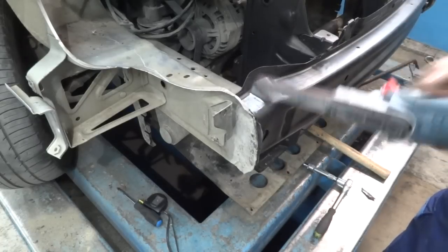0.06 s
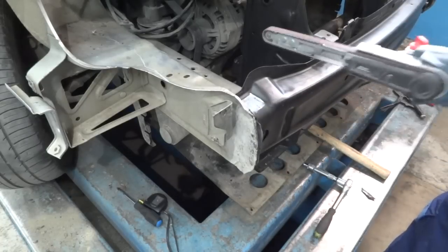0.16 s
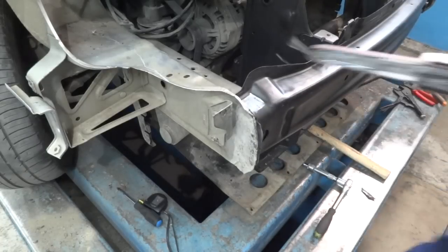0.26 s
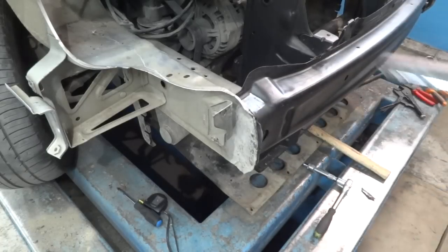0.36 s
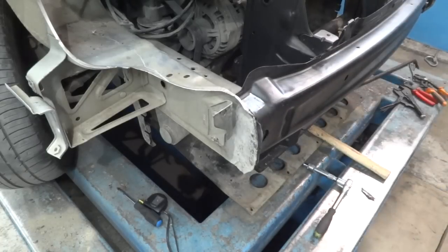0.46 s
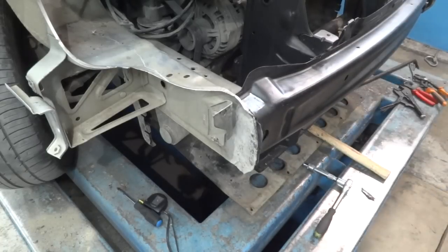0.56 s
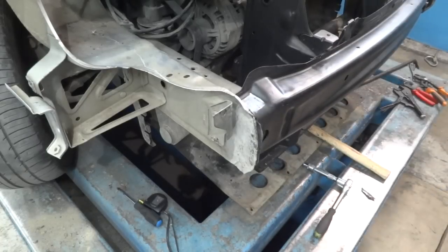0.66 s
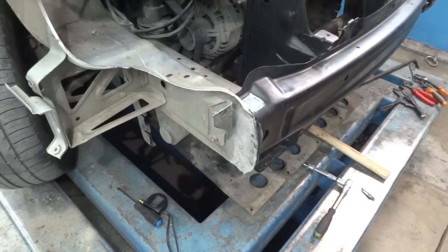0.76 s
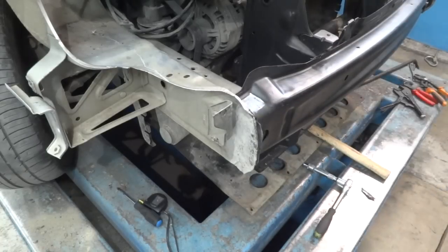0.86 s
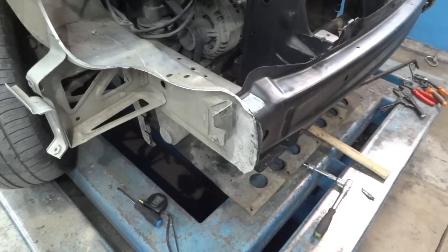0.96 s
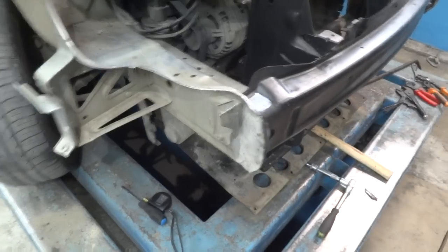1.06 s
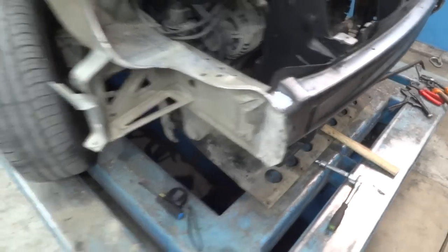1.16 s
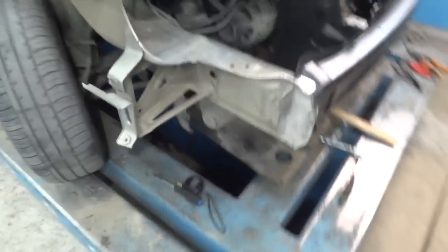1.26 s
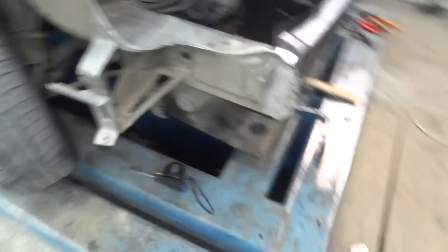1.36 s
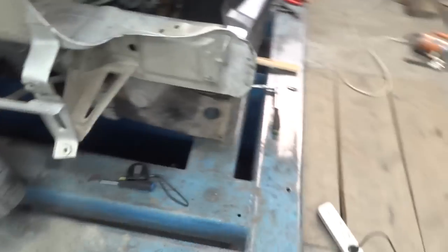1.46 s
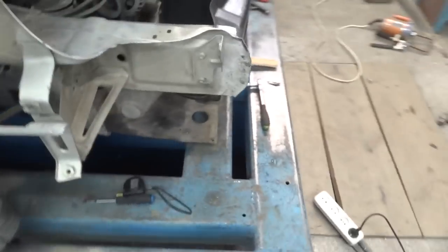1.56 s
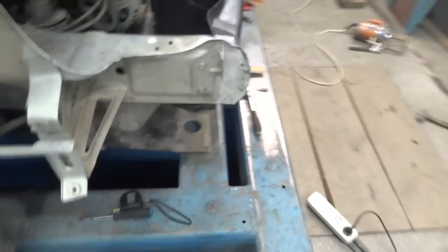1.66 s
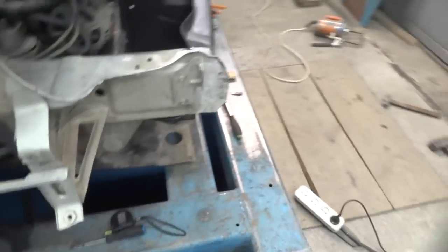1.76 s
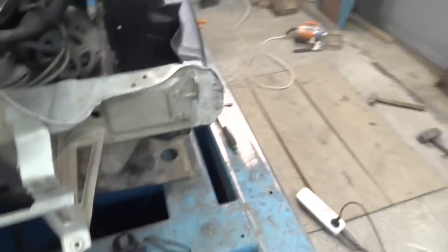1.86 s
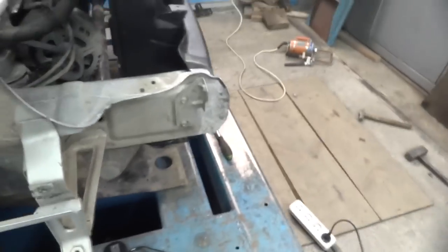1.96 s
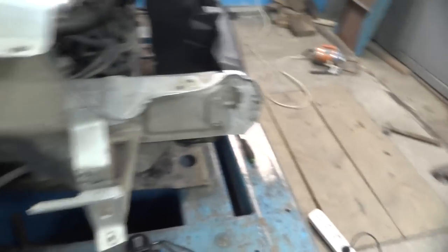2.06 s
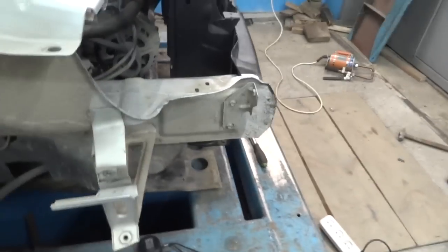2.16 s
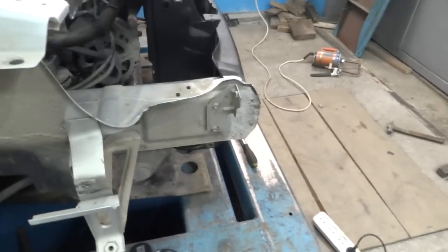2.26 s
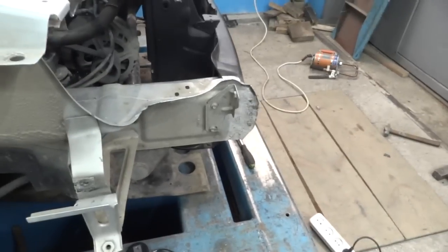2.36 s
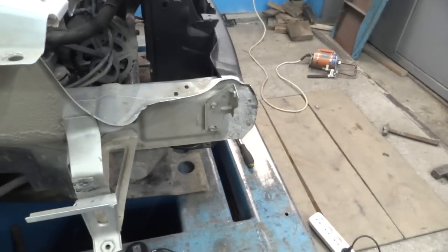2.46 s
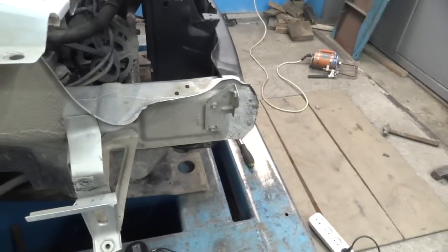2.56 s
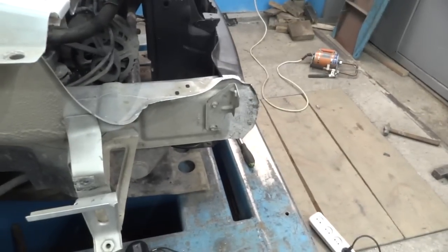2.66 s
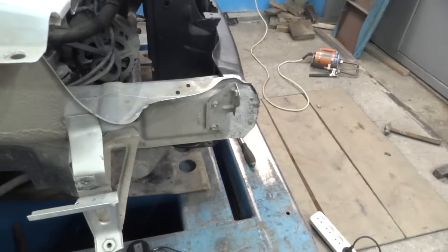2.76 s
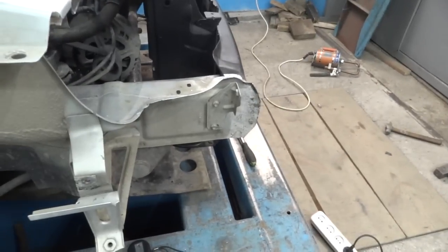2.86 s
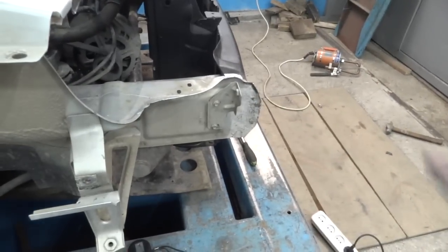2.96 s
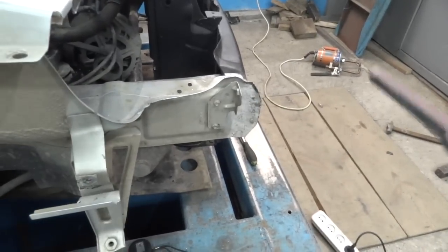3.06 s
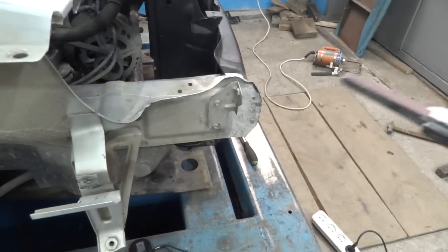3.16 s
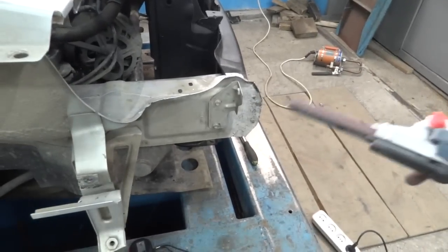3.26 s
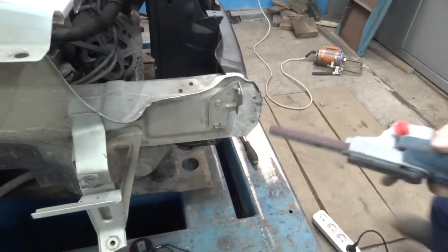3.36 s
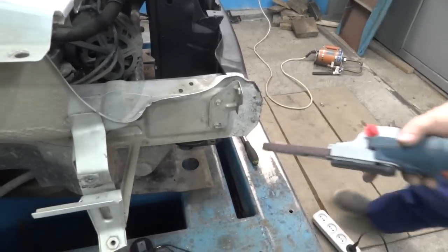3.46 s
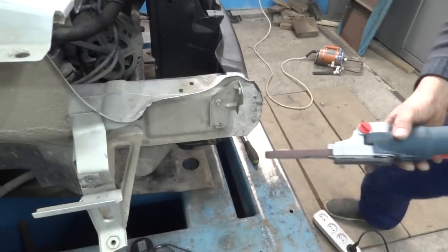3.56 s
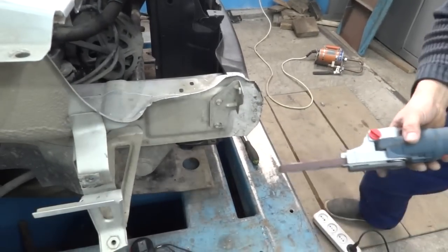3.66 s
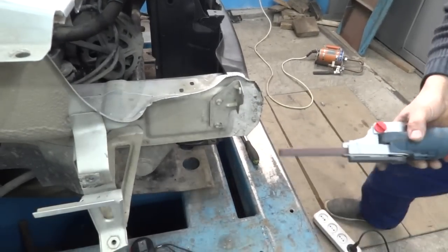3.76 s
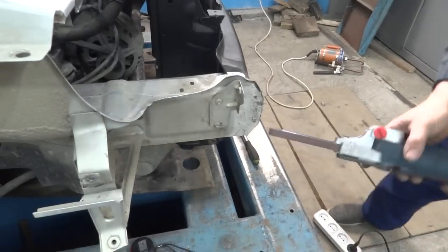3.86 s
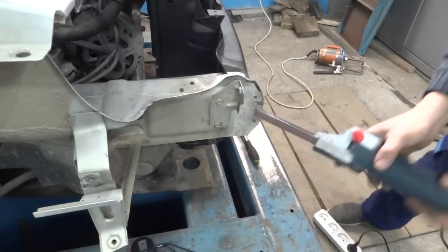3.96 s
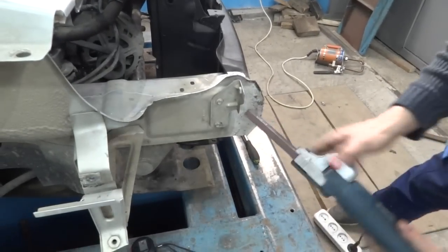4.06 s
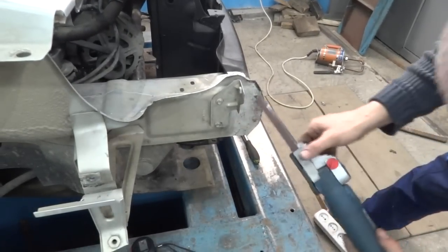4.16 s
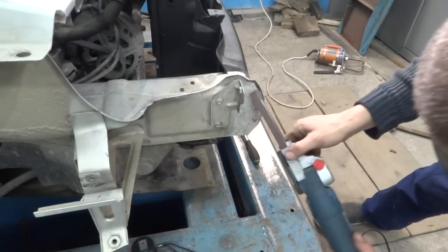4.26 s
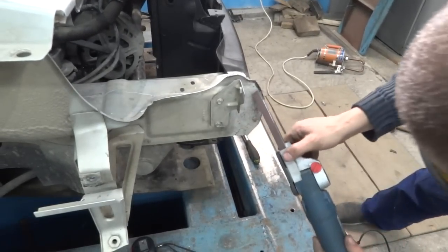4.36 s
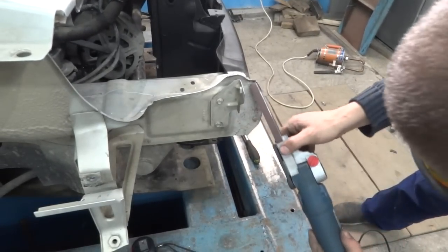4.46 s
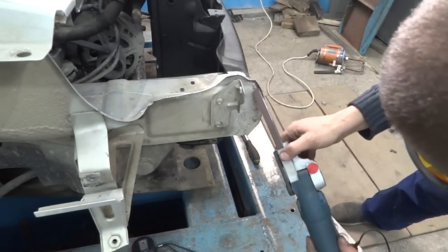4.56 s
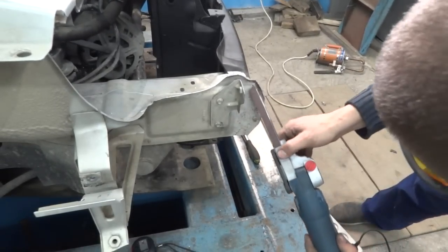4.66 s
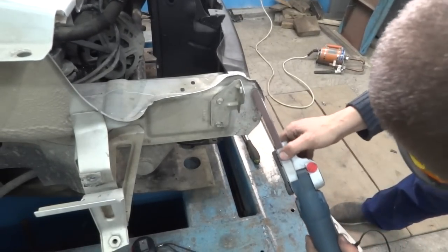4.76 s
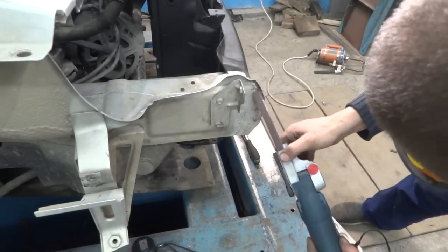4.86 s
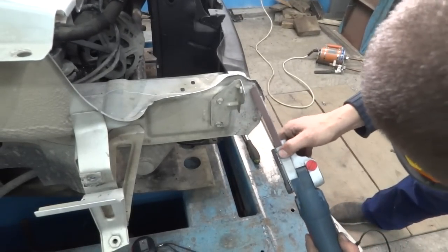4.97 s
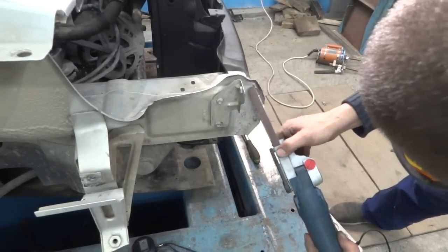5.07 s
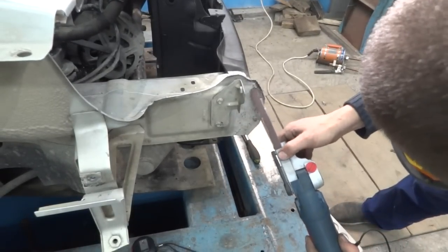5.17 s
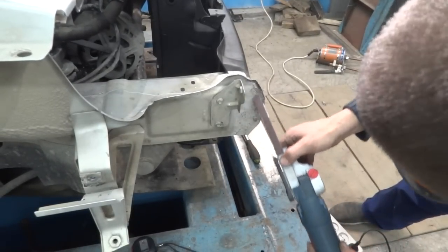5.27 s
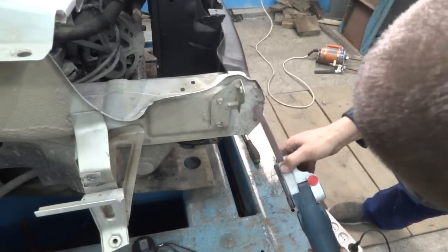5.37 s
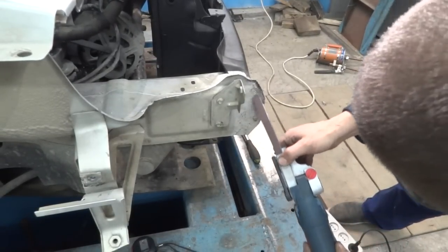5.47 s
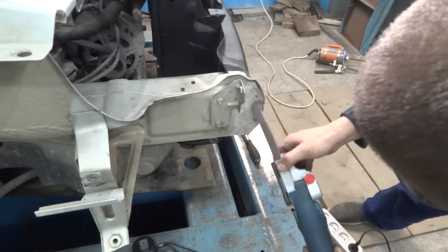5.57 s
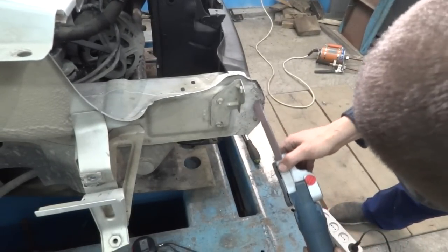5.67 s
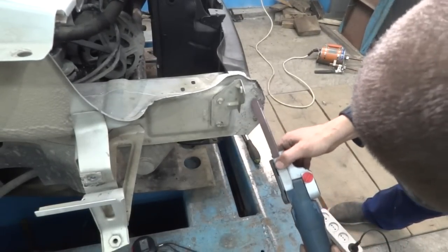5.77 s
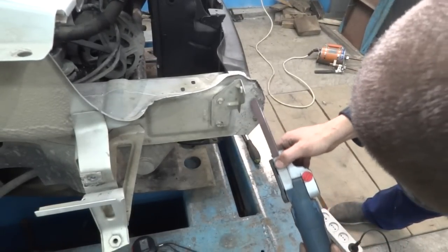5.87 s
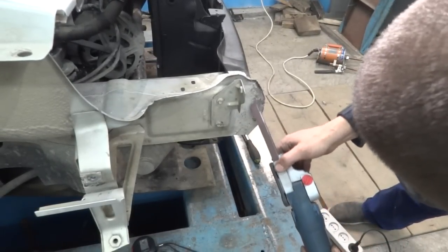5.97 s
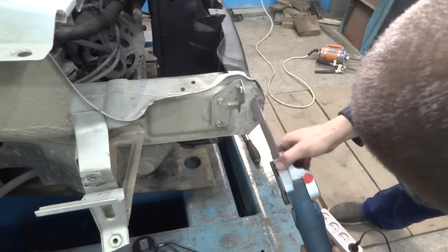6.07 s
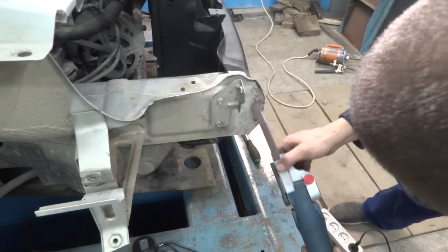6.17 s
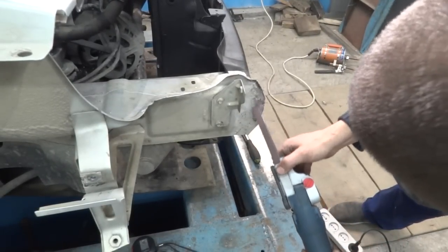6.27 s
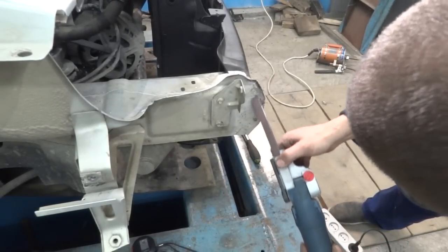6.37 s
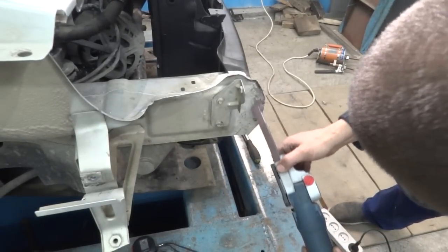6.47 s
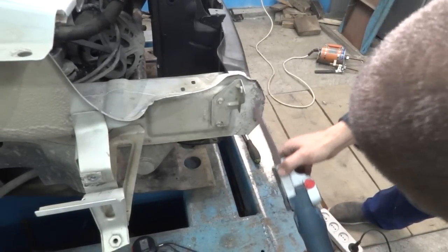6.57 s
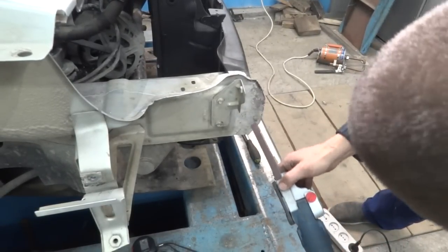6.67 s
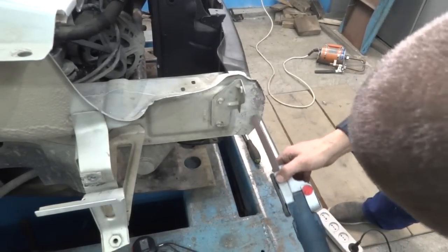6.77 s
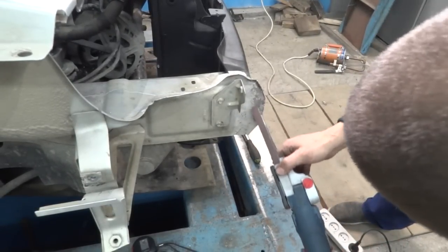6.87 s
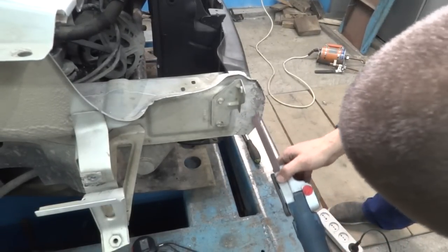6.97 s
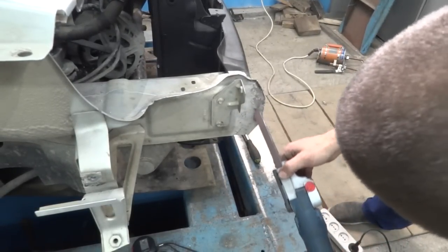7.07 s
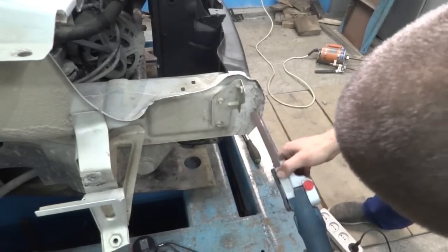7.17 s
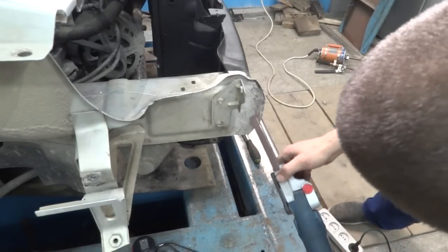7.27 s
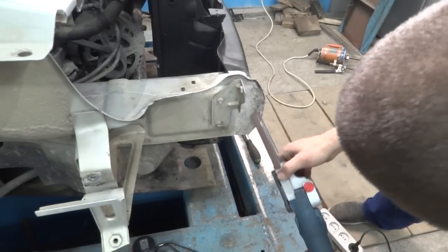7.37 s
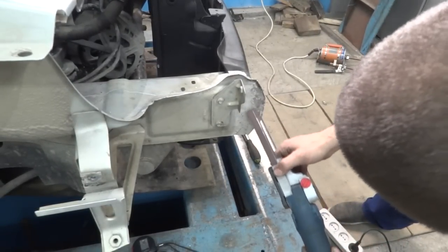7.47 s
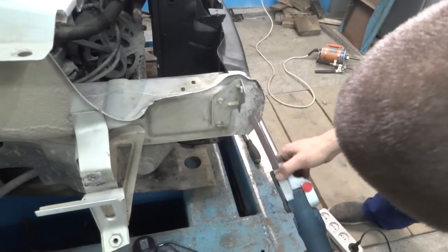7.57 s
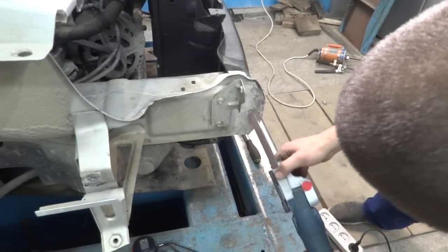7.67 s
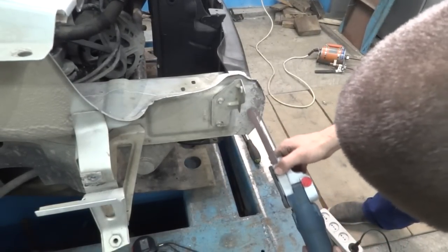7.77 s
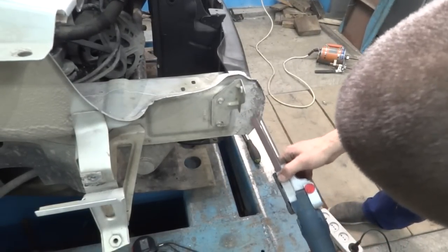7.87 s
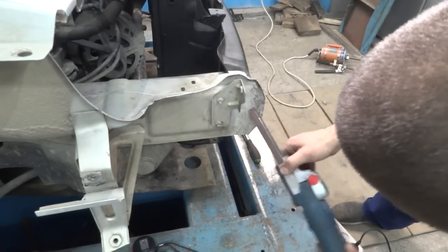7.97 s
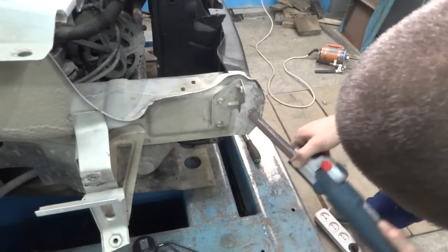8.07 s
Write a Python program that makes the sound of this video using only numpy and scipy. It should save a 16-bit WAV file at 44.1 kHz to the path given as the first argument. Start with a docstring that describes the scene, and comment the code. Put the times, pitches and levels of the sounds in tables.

```python
"""A handheld belt file grinds a car's steel frame rail in a garage, lifts off and winds down.
Clothes rustle and things knock while the worker changes sides; then the motor spins up again
and the belt bites in three long strokes, the motor sagging under each. The grind is noise through
the rail's flaring resonances; the motor is shaped rush with a whine and overtones tied to the shaft.
Rubs, taps and thuds are short noise bursts; a noise tail gives the garage, with still air behind."""
import sys
import numpy as np
from scipy import signal
from scipy.io import wavfile
from scipy.ndimage import uniform_filter1d

SR = 44100
rng = np.random.default_rng(int(sys.argv[2]) if len(sys.argv) > 2 else 0)


def transcribe(u):
    """Save the signal u as a 16-bit wav file named by the first command-line argument.

    u: samples, shape (n,) or (channels, n), limited to [-1, 1]; the rate is SR.
    q: integer samples, one column per channel.
    """
    v = np.clip(np.atleast_2d(u).T, -1, 1)
    q = np.round(v * 32767).astype(np.int16)
    wavfile.write(sys.argv[1], SR, q)


N = 358091
T = np.arange(N) / SR

# the belt pressed on the steel: start t/s, end t/s, level/dB, motor sag at first f/Hz,
# sag at last f/Hz, rocks of the hand [1/s], rocking depth/dB
STROKES = [(-.03, 0.078, -26.5, 105, 104.6, 4.4, -6), (4.369, 5.377, -24, 55, 149.2, 5.8, 0),
           (5.478, 6.664, -23, 128, 152, 6.86, 0), (6.852, 8.196, -22.5, 82, 82, 6.74, 1)]
# ringing of the frame rail: f/Hz, width f/Hz, mean level/dB above the rasp
RAIL_MODES = [(578, 50, 17), (805, 45, 17), (1219, 135, 14), (1349, 107, 11), (1647, 14, 8),
              (2013, 120, 14), (2202, 31, 9), (2339, 120, 10), (2505, 46, 8), (3292, 117, 15),
              (3583, 130, 13), (3726, 70, 13), (4280, 78, 13), (4490, 102, 7), (4823, 122, 11),
              (5001, 109, 9), (5262, 170, 8), (5571, 50, 10), (5642, 55, 10), (5945, 90, 7),
              (6354, 158, 12), (6601, 162, 8), (7035, 150, 10), (7275, 114, 11), (7765, 220, 10),
              (9045, 240, 9), (10180, 180, 6), (10550, 140, 6), (11743, 380, 8)]
# dips and small lifts between the rail's resonances: f/Hz, width f/Hz, level/dB
RAIL_GAPS = [(1010, 26, 0), (1640, 160, -5), (2940, 510, -2.5), (4430, 110, 1.5), (6210, 75, -1),
             (6620, 130, -8), (7360, 47, -1.5), (8630, 830, -2.5), (10900, 220, -2.5)]
# colour of the rasp at each place that the belt touches: f/Hz, level/dB in stroke 1, 2, 3, 4
RASP_COLOURS = [(250, -49.5, -49, -57, -59), (430, -33.5, -11, -68, -70), (470, -4.5, -20.5, -48, -57),
                (706, -17, -17, -17, -19), (1020, -20.5, -16.5, -24.5, -11.5),
                (1520, -5.5, -7, -6.5, -12.5), (2246, -5.5, 4, -2, -0.5), (3000, -30.5, -1.5, -5.5, -2.5),
                (3610, 4, 0.5, -3.5, -6), (4640, -3, 1, -2.5, 1.5), (6430, 2.5, 4.5, -0.5, -3),
                (8000, 0, 1.5, -2.5, -1), (10000, 11.5, 3.5, -1, -2), (12800, -11.5, 1.5, -4, -5),
                (15600, -23.5, -4.5, -4, -6)]
# the belt chatters and one mode sings out: start t/s, length t/s, centre f/Hz, peak level/dB
CHATTER_RINGS = [(-.03, 0.21, 1648, -36.5), (-.03, 0.2, 2004, -35), (-.03, 0.12, 2156, -31.5),
                 (-.03, 0.19, 3270, -34), (-.03, 0.14, 9600, -37), (3.874, .075, 4010, -30),
                 (4.38, 0.074, 2080, -32), (4.404, 0.14, 4330, -36.5), (4.551, 0.95, 3718, -33),
                 (6.045, .62, 5580, -34.5), (6.86, 0.12, 4830, -47), (7.642, 0.049, 2010, -31.5),
                 (7.644, 0.13, 3310, -29.5)]
# overtones from fan blades and commutator:
# multiple of the whine [ratio], basic level/dB against the rush, width f/Hz
OVERTONES = [(2, -22, 12), (2.52, -23, 25), (3, -21, 15), (4, -23, 15), (7.9, -17, 120), (8, -16, 20),
             (8.6, -19, 300), (10, -12.5, 12), (11, -21, 40), (20, -21, 60), (29.5, -11, 250),
             (31.2, -17, 120)]
# colour of the motor's rush, of which the rows above 1200 Hz are used: f/Hz, level/dB
RUSH_TREBLE = [(590, -46), (1000, -16), (1480, -7.5), (1700, -5.5), (2610, 2), (3140, 0), (5400, 0),
               (6130, 0.5), (8570, 3), (9290, 0.5), (13900, -2), (15800, -4)]
# bottom end of the same rush: f/Hz, level/dB
RUSH_BASS = [(150, -66), (350, -73), (550, -23), (800, -19.5), (1100, -9)]
# hollow rustle of the slowing belt: f/Hz, level/dB
SLOW_BELT_COLOUR = [(180, -47), (300, -23), (354, -30.5), (600, -26.5), (731, -27.5), (821, -11),
                    (1160, -13), (1940, 1.5), (2440, -6.5), (3450, -2), (3870, -1.5), (8280, 0.5),
                    (15500, -3.5)]
# level of the rush at full speed, before the left-right balance: t/s, level/dB
TOOL_LEVEL = [(0, -26), (.2, -28), (.46, -28.5), (1.4, -25.5), (3.87, -26.5), (4.36, -24.5), (4.48, -37),
              (8.12, -39)]
# whine against the rush at full speed, before rail resonance and flutter: t/s, level/dB
WHINE_LEVEL = [(.05, -25.5), (.24, -8), (.5, -12.5), (4.02, -12.5), (4.55, -15.5), (4.85, -6), (5.5, -12.5),
               (5.72, -1.5), (5.85, -25.5), (6.96, -6.5), (7.35, -23), (7.6, -8), (8.12, -20.5)]
# sharp plastic clicks, the last one the trigger: t/s, level/dB
CLICKS = [(1.688, -44), (2.986, -53), (3.791, -29)]
# rustles and brief scrapes, before the mix trim: t/s, length t/s, level/dB, tilt [dB/octave]
RUBS = [(1.512, .14, -62.5, -1), (1.661, 0.16, -58, -1), (1.737, 0.062, -50, 4), (1.93, 0.088, -45.5, -2.5),
        (2.049, 0.045, -50.5, -2), (2.117, 0.099, -50.5, -2), (2.262, 0.052, -48.5, 0.5),
        (2.377, .045, -39, 4), (2.423, .05, -70, 2), (2.719, 0.19, -74, 0.5), (2.921, 0.084, -62, -4),
        (3.045, 0.11, -53.5, 4), (3.088, 0.091, -61, -6), (3.226, 0.042, -25, 1.5),
        (3.262, 0.08, -53, -4.5), (3.552, 0.34, -57.5, -3.5), (3.688, 0.091, -38, -0.8)]
# colour of cloth, also used for the clicks: f/Hz, level/dB
CLOTH_COLOUR = [(120, -52), (200, -29), (283, -44), (557, -20.5), (1640, -0.5), (2990, -0.5), (4080, 3),
                (4390, 1.5), (8030, 2), (11600, 1), (15800, -0.5)]
# knocks of handling and footsteps:
# t/s, level/dB, thud level/dB against the tap, decay t60/s, ring f/Hz
KNOCKS = [(1.525, -67, -10, 0.051, 3000), (1.582, -77, -12, 0.055, 3000), (1.665, -54, -9, 0.17, 2300),
          (1.688, -39.5, -8, 0.035, 690), (1.716, -52, -1, 0.09, 2300), (1.752, -45, -6, 0.036, 2380),
          (1.883, -51, -5, 0.096, 600), (1.9, -49.5, -4, 0.096, 2300), (2.019, -55.5, -4, 0.13, 600),
          (2.084, -49.5, -4, 0.05, 2000), (2.169, -53, -11, 0.19, 2000), (2.32, -49.5, -8, 0.12, 770),
          (2.439, -57, -6.5, 0.11, 1980), (2.54, -61, -24, 0.075, 2840), (2.937, -57, -18, 0.087, 1700),
          (2.952, -48.5, -23, 0.044, 3080), (2.982, -59, -13, 0.38, 400), (3.054, -49.5, -19, 0.29, 1870),
          (3.544, -51, -10, 0.25, 1700), (3.587, -53.5, -19, 0.27, 420), (3.633, -66, -8, 0.1, 1700),
          (3.696, -68, -28, 0.083, 1600)]
# colour of the tap: f/Hz, level/dB
TAP_COLOUR = [(100, -45), (400, -5.5), (750, -1), (1100, 0), (1600, -3.5), (2400, -0.5), (3500, -4.5),
              (6000, -8.5), (15000, -19)]
# colour of the thud: f/Hz, level/dB
THUD_COLOUR = [(25, -25), (70, -61), (130, 8), (200, 3), (290, 11), (400, 10), (700, -7), (2000, -46)]
# modes of the hollow rap: f/Hz, level/dB, decay t60/s
RAP_MODES = [(777, -53.5, 0.088), (805, -60, .08)]
# modes of the metal clink as the belt stops: f/Hz, level/dB, decay t60/s
CLINK_MODES = [(1830, -73, 0.13), (2820, -63, 0.11), (3000, -59, 0.11), (3063, -65, .12), (5315, -69, .1)]
# reverberation of the garage: f/Hz, decay t60/s
GARAGE_DECAY = [(200, 0.71), (1000, 0.53), (4000, 0.43), (9000, 0.4), (15000, 0.22)]
# colour of the still air: f/Hz, level/dB
AIR_COLOUR = [(18, -40), (30, -17.5), (180, -20.5), (253, -19.5), (384, -9.5), (485, -9), (612, -2),
              (1870, -4), (7830, -11), (9390, -4), (15000, -32.5)]
# the two microphone ports: f/Hz, likeness [0-1], phase by which left leads [rad]
PORTS = [(100, 1, 0), (704, 0.68, 0.4), (2060, 0.9, 0.81), (4020, 0.94, 0.57), (7060, 1, 0.62),
         (9630, 0.94, 0.11), (15000, 0.85, 0)]

# the motor, its speed given as the pitch of its whine
OFF_S, STOP_S, ON_S = .455, 1.53, 3.785
FREE_HZ, SPIN_UP_S = 895, .155
COAST_S, DRAG_HZ, LAST_TURNS_S = .72, 64, .15
START_S = .05  # the tool's sound builds this fast once the trigger is pulled
RUSH_DB_PER_OCTAVE, WHINE_DB_PER_OCTAVE = 11, 24.5  # fades as the shaft slows; the rush's is before the restart
HOUSING_HZ, HOUSING_WIDTH_HZ, HOUSING_BOOST_DB = 4080, 380, 14
GEAR_MULTIPLE, GEAR_LOUDEST_HZ, GEAR_WIDTH_HZ = 2.52, 1300, 330  # multiple of the whine
LOAD_FLUTTER_DB, LOAD_SHUDDER_RAD = 4, .65  # the load jerks the whine in level and phase
# the belt on the rail
BITE_S, LIFT_DB_PER_S = 0.023, 105  # how the belt takes hold and lets go
ROCK_LAG_S = 0.027  # the first rock of the hand peaks this long after the touch
BASS_CUT_HZ = 384  # bass cut of the tool's sound: corner frequency of the high-pass
# the knocks
RAP_S, CLINK_S = 2.32, 1.524
KNOCK_ATTACK_S, SHARP_KNOCK_S = 0.00061, 0.093  # rise of a sharp knock, and its longest decay
BOARD_HZ, BOARD_DB, BOARD_T60_S = 300, -3, 0.12  # low ring under every knock, dB against the thud
# air and top of the band
AIR_DB = -73
EDGE_HZ = 15950


def amp(db):
    """Decibels to linear gain."""
    return 10 ** (np.asarray(db) / 20)


def evened(x):
    """The same signal at unit RMS."""
    return x / np.sqrt(np.mean(x ** 2) + 1e-20)


def read(rows, hz, order=1):
    """One column of a spectrum table, on a log-frequency axis."""
    rows = np.array(rows, float)
    return np.interp(np.log(hz + 1), np.log(rows[:, 0] + 1), rows[:, order])


def curve(rows, order=1):
    """One column of a time table at every sample."""
    rows = np.array(rows, float)
    return np.interp(T, rows[:, 0], rows[:, order])


def peak(hz, centre_hz, width_hz):
    """Bell of a resonance: one at the centre, half at the edges of its width."""
    return 1 / (1 + (2 * (hz - centre_hz) / width_hz) ** 2)


def drift(rate_hz):
    """Smooth random wander of unit RMS."""
    knots = rng.standard_normal(4 * N // 50)
    return evened(np.interp(T * 2 * rate_hz, np.arange(len(knots)), knots))


def add(mix, s, sound):
    """Lay a sound into the mix at s seconds."""
    part = mix[:, max(round(s * SR), 0):][:, :sound.shape[-1]]
    part += sound[..., :part.shape[1]]


def noise(colour_db, count=N, size=1024):
    """Noise of unit level over both ports; colour_db(hz, frames) gives its spectrum."""
    hop = size // 4
    hz, frames = np.fft.rfftfreq(size, 1 / SR), count // hop + 6
    a, b, c, d = rng.standard_normal((4, frames, len(hz)))
    likeness = np.clip(read(PORTS, hz), 0, 1)
    left = a + 1j * b
    right = likeness * left + np.sqrt(1 - likeness ** 2) * (c + 1j * d)
    right = right * np.exp(-1j * read(PORTS, hz, order=2))
    spectra = np.array([left, right]) * amp(colour_db(hz, frames))
    sound = signal.istft(spectra.swapaxes(1, 2), nperseg=size, noverlap=size - hop)[1]
    return evened(sound[:, :count])


def tone(phase, hz):
    """A line of unit level, the left port leading in phase."""
    return np.sqrt(2) * np.sin([phase, phase - read(PORTS, hz, order=2)])


def contact(start, end):
    """Pressure of one stroke: a quick bite, a hold, a slower lift."""
    return np.clip((T - start) / BITE_S, 0, 1) * amp(-LIFT_DB_PER_S * np.maximum(T - end, 0))


def rocking(since, hz, rate, depth_db, fizz_share=.6, unsteady_db=1.24, judder_db=3.0):
    """The hand rocks the belt, trading modes near 2 kHz against top fizz; the low modes judder (dB)."""
    stray = evened(uniform_filter1d(rng.standard_normal(len(since)), size=9))
    judder = evened(uniform_filter1d(rng.standard_normal(len(since)), size=3))
    tilt_db = depth_db * np.cos(2 * np.pi * rate * (since - ROCK_LAG_S)) + unsteady_db * stray
    low = 1 / (1 + ((hz - 2150) / 550) ** 4)
    top = 1 / (1 + (8500 / (hz + 1)) ** 8)
    lowest = 1 / (1 + (hz / 1300) ** 4)
    return tilt_db[:, None] * (low - fizz_share * top) + judder_db * judder[:, None] * lowest


def grinding(flare_db=3.0, ripple_db=3.0, grit_db=0.47, bounce_db=0.43, left_db=0.28):
    """Grit rasps the rail; each resonance flares and fades as the contact shifts."""
    out = np.zeros((2, N))
    size = 2048
    mode_hz, width_hz, mode_db = np.transpose(RAIL_MODES)
    # countless weak panel modes ripple the spectrum between the strong ones
    ripple = evened(uniform_filter1d(rng.standard_normal(size // 2 + 1), 2))
    bins = np.fft.rfftfreq(size, 1 / SR)
    gaps_db = sum(db * peak(bins, hz, width) for hz, width, db in RAIL_GAPS)
    for k, (start, end, db, _, _, rock_rate, rock_db) in enumerate(STROKES):
        def colour_db(hz, frames):
            flare = rng.standard_normal((frames, len(RAIL_MODES)))
            flare = evened(uniform_filter1d(flare, size=5, axis=0))
            peaks = peak(hz, mode_hz[:, None], width_hz[:, None])
            ring = amp(mode_db + flare_db * flare) ** 2 @ peaks
            hop = size // 4
            rocked_db = rocking(T[:frames * hop:hop], hz, rock_rate, rock_db)
            rasp_db = read(RASP_COLOURS, hz, order=k + 1)
            return rasp_db + 10 * np.log10(1 + ring) + ripple_db * ripple + gaps_db + rocked_db
        touching = (T >= start) & (T <= end + .3)  # leaves room for the lift
        rasp = noise(colour_db, count=touching.sum(), size=size)
        out[:, touching] += amp(db) * contact(start, end)[touching] * rasp
    unsteady = amp(grit_db * drift(160) + bounce_db * drift(25))
    return out * unsteady * amp([[left_db], [-left_db]])


def chatter(width_hz=38):
    """Narrow rings of the chattering belt, unsteady in pitch, that swell and fade."""
    out = np.zeros((2, N))
    for s, length, hz, db in CHATTER_RINGS:
        u = np.clip((T - s) / length, 0, 1)
        live = (u > 0) & (u < 1)
        phase = 2 * np.pi * np.cumsum(hz + width_hz * drift(100)[live]) / SR
        out[:, live] += amp(db) * np.sin(np.pi * u[live]) * tone(phase, hz)
    return out


def speed():
    """Powered, the shaft eases toward free speed less the load's sag; switched off, it coasts to rest."""
    sag = sum(np.interp(T, [start, end], [first, last], left=0, right=0)
              for start, end, _, first, last, *_ in STROKES)
    powered = (T < OFF_S) | (T > ON_S)
    aim = (FREE_HZ - sag) * powered
    keep = np.exp(-1 / (SPIN_UP_S * SR))
    driven = aim[0] + signal.lfilter([1 - keep], [1, -keep], aim - aim[0])
    off_hz = np.interp(OFF_S, T, driven)
    coasting = (off_hz + DRAG_HZ) * np.exp((OFF_S - T) / COAST_S) - DRAG_HZ
    coasting *= np.sqrt(np.clip((STOP_S - T) / LAST_TURNS_S, 0, 1))
    return np.maximum(np.where(powered, driven, coasting), 1)


def whine(hz, phase, rail_db=6, waver_db=1, gear_db=-20):
    """The shaft's note shudders under load and swells near a rail resonance; a gear sings while coasting."""
    load = sum(contact(start, end) for start, end, *_ in STROKES)
    rail_hz, rail_width_hz, _ = RAIL_MODES[1]
    resonance_db = rail_db * peak(hz, rail_hz, rail_width_hz)
    db = curve(WHINE_LEVEL) + WHINE_DB_PER_OCTAVE * np.log2(hz / FREE_HZ) + load * resonance_db
    flutter_db = (waver_db + LOAD_FLUTTER_DB * load) * np.minimum(drift(13), 1)
    note = amp(db + flutter_db) * tone(phase + LOAD_SHUDDER_RAD * load * drift(30), hz)
    gear_hz = GEAR_MULTIPLE * hz
    swell = np.exp(-((gear_hz - GEAR_LOUDEST_HZ) / GEAR_WIDTH_HZ) ** 2)
    gear = amp(gear_db + drift(24)) * (T < STOP_S) * swell
    return note + gear * tone(GEAR_MULTIPLE * phase, gear_hz)


def overtones(hz, phase, acceleration, colour, level_db=-1, straining_db=4, waver_db=3.0):
    """Fan-blade and commutator lines at multiples of the shaft's note, smeared and wavering."""
    out = np.zeros((2, N))
    straining = acceleration > 1500  # Hz/s; hard acceleration shakes the housing
    torque = np.clip(acceleration / 500, 0, 1)  # and brings out the overtones near 7 kHz
    turning = np.clip(hz / 560, 0, 1) ** 3
    for multiple, db, width in OVERTONES:
        line_hz = multiple * hz
        housing_db = HOUSING_BOOST_DB * peak(line_hz, HOUSING_HZ, HOUSING_WIDTH_HZ) * straining
        torque_db = level_db + straining_db * torque / (1 + ((line_hz - 7000) / 1500) ** 4)
        smear = 2 * np.pi * np.cumsum(drift(600)) / SR * np.sqrt(abs(width) * 150)
        # overtones are turned down where the rush is weak, mostly in the bass
        colour_db = np.minimum(read(colour, line_hz) + 3, 0)
        gain = amp(db + torque_db + colour_db + housing_db + waver_db * drift(14))
        in_band = line_hz < EDGE_HZ
        out += gain * in_band * turning * tone(multiple * phase + smear, line_hz)
    return out


def motor(flutter=0.1, wobble=0.0022, rattle=0.037, right_db=.5):
    """Fan and belt rush under a whine and its overtones, all following the shaft."""
    shaft_hz = speed()
    acceleration = np.gradient(shaft_hz) * SR
    hz = shaft_hz * (1 + wobble * drift(18))
    phase = 2 * np.pi * np.cumsum(hz) / SR
    colour = RUSH_BASS + [row for row in RUSH_TREBLE if row[0] > 1200]
    fast = noise(lambda f, frames: read(colour, f))
    slow = noise(lambda f, frames: read(SLOW_BELT_COLOUR, f))
    share = np.clip(hz / 820, 0, 1) ** 2  # as the tool slows, the hollow rustle of the belt takes over
    rush = np.sqrt(share) * fast + np.sqrt(1 - share) * slow
    rollers = rattle * (1.3 - share) * 2 * np.cos(phase * 0.78)  # they rattle more at low speed
    rush *= 1 + flutter * drift(70) + rollers
    lines = overtones(hz, phase, acceleration, colour)
    starting = np.clip((T - ON_S) / START_S, 0, 1) ** 2
    slowing = amp(RUSH_DB_PER_OCTAVE * np.log2(shaft_hz / FREE_HZ))
    effort = np.where(T > ON_S, starting, slowing)
    sound = rush + lines + whine(hz, phase)
    return amp(curve(TOOL_LEVEL)) * effort * sound * amp([[-right_db], [right_db]])


def clicks(t60=0.019):
    """Bright snaps of plastic: noise with almost no ring."""
    out, t = np.zeros((2, N)), T[:SR // 20]
    for s, db in CLICKS:
        snap = noise(lambda f, frames: read(CLOTH_COLOUR, f), count=len(t))
        add(out, s, amp(db - 60 * t / t60) * snap)
    return out


def rustles(grain_db=2):
    """Each rub swells quickly and dies away, grainy with the weave."""
    out = np.zeros((2, N))
    for s, length, db, tilt_db in RUBS:
        u = np.linspace(0, 1, int(max(length, .01) * SR))
        hiss = noise(lambda f, frames: read(CLOTH_COLOUR, f) + tilt_db * np.log2((f + 100) / 4000),
                     count=len(u), size=512)
        add(out, s, amp(db) * np.sin(np.pi * u ** 1.05) * hiss)
    return out * amp(grain_db * drift(250))


def knocks(thud_ring=0.81, ring_db=8):
    """Dull taps over a low thud, a small metal clink as the belt stops, and a hollow rap."""
    out, t = np.zeros((2, N)), T[:SR // 3]
    for s, db, thud_db, t60, ring_hz in KNOCKS:
        attack_s = KNOCK_ATTACK_S * max(t60 / SHARP_KNOCK_S, 1) ** 2  # long knocks are soft ones
        tap = noise(lambda f, frames: read(TAP_COLOUR, f) + ring_db * peak(f, ring_hz, ring_hz / 2),
                    count=len(t))
        tap = tap * amp(-60 * t / t60)
        thud = noise(lambda f, frames: read(THUD_COLOUR, f), count=len(t))
        thud = thud * amp(thud_db - 60 * t / (t60 * thud_ring))
        board = amp(thud_db + BOARD_DB - 60 * t / BOARD_T60_S) * tone(2 * np.pi * BOARD_HZ * t, BOARD_HZ)
        add(out, s, amp(db) * (tap + thud + board) * (1 - np.exp(-t / attack_s)))
    for s, modes in (CLINK_S, CLINK_MODES), (RAP_S, RAP_MODES):
        ring = sum(amp(db - 60 * t / t60) * tone(2 * np.pi * hz * t, hz) for hz, db, t60 in modes)
        add(out, s, ring)
    return out


def garage(x, apart=0.14):
    """A diffuse tail whose treble dies first; the close ports hear nearly the same."""
    size, count = 256, SR // 2
    hop = size // 4
    tails = noise(lambda f, frames: -60 * T[:frames * hop:hop, None] / read(GARAGE_DECAY, f),
                  count=count, size=size)
    tails = tails * (1 - np.exp(-T[:count] / 0.0023))
    tails = tails + apart * (tails - tails[::-1]) / 2  # widens the pair a little
    return signal.fftconvolve(x.mean(0)[None], tails / np.linalg.norm(tails[0]), axes=1)[:, :N]


def background(tick_db=-70, tick_hz=9400, rate_hz=92):
    """Still air as shaped noise, with a faint, high, regular ticking."""
    since = T % (1 / rate_hz)
    ticks = np.exp(-((since - .002) / .0005) ** 2) * np.sin(2 * np.pi * tick_hz * since)
    air = amp(AIR_DB) * noise(lambda f, frames: read(AIR_COLOUR, f))
    return air + amp(tick_db + 3 * drift(40)) * ticks


def scene(tool_room_db=-9, near_db=-1, rub_room_db=-2, knock_room_db=-7):
    """The tool close by, the worker's movements and the room around them."""
    bass_cut = signal.butter(4, BASS_CUT_HZ, "high", fs=SR, output="sos")
    tool = signal.sosfilt(bass_cut, grinding() + chatter() + motor() + clicks())
    rubs, bumps = rustles(), knocks()
    echo = garage(amp(tool_room_db) * tool + amp(rub_room_db) * rubs + amp(knock_room_db) * bumps)
    return tool + amp(near_db) * rubs + bumps + echo + background()


def record(dry):
    """Band limit of the pickup: a steep low-pass at the top edge."""
    low_pass = signal.firwin(511, EDGE_HZ, window=("kaiser", 9), fs=SR)
    return signal.oaconvolve(dry, low_pass[None], "same")


dry = scene()
out = record(dry)
transcribe(out)
```